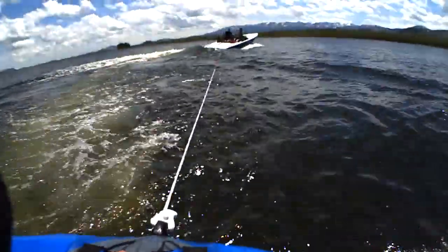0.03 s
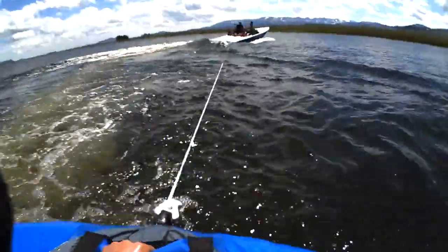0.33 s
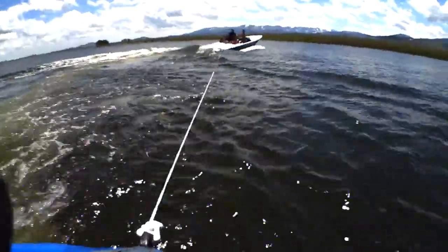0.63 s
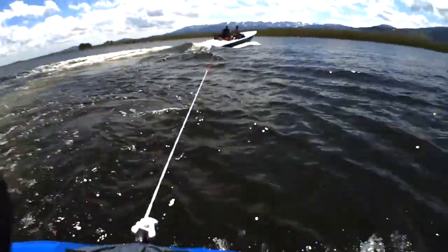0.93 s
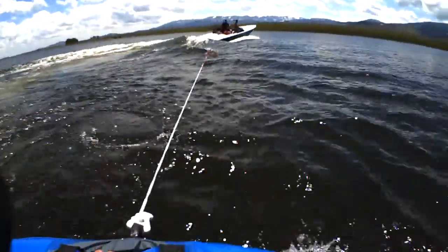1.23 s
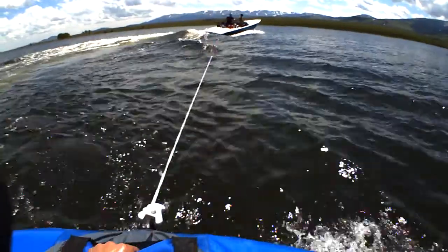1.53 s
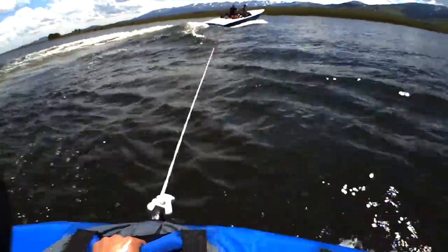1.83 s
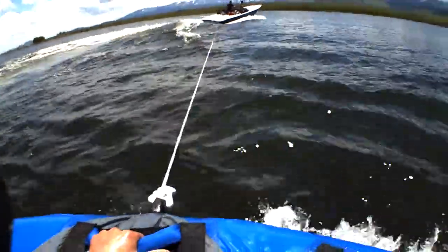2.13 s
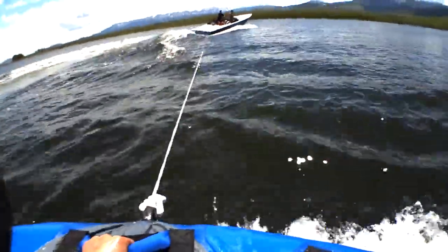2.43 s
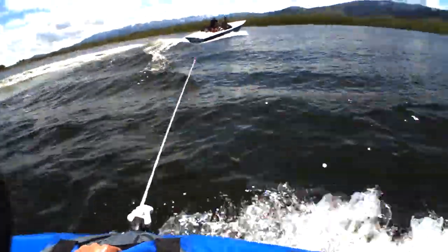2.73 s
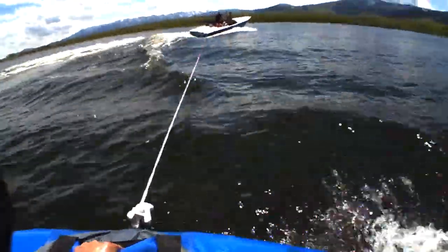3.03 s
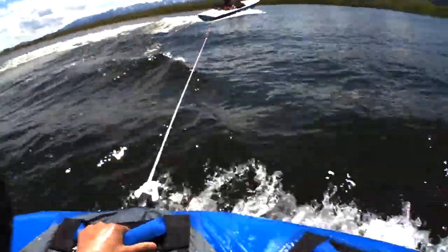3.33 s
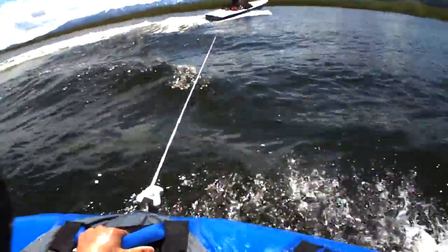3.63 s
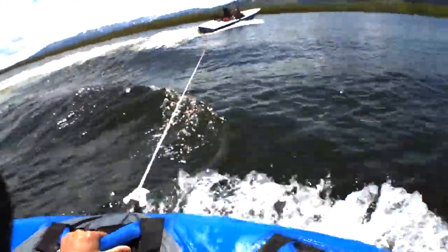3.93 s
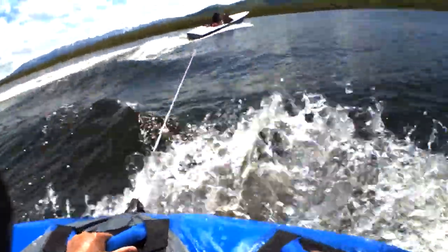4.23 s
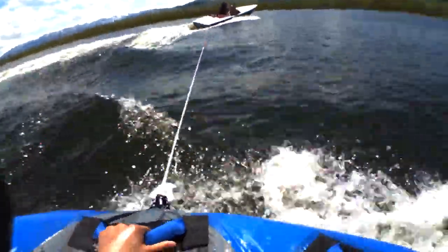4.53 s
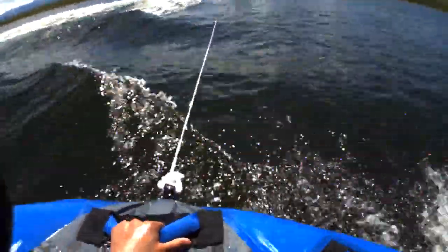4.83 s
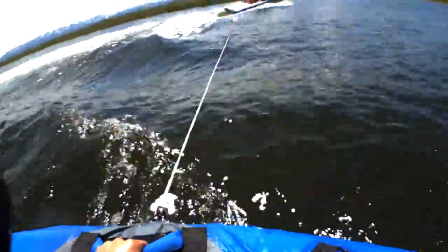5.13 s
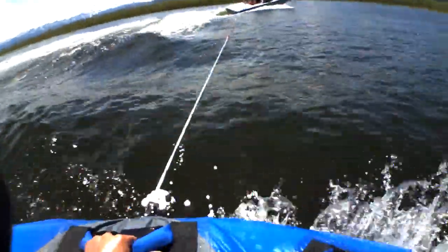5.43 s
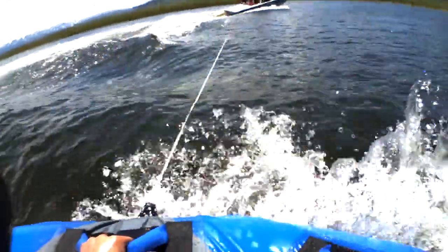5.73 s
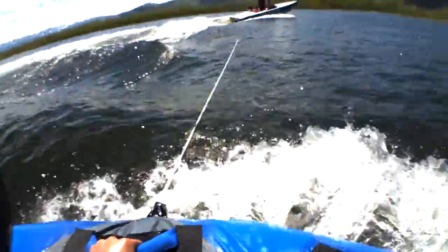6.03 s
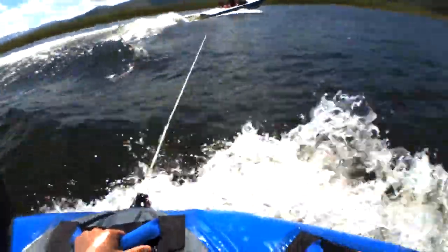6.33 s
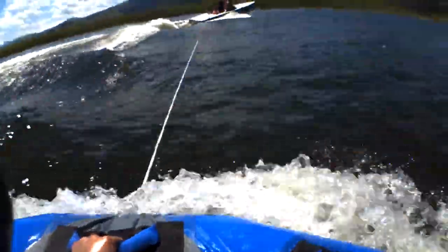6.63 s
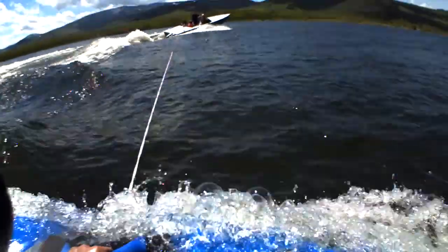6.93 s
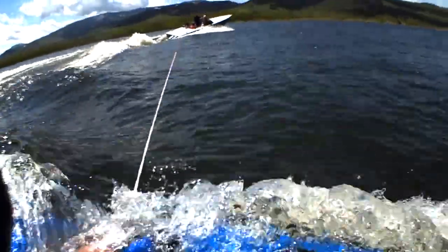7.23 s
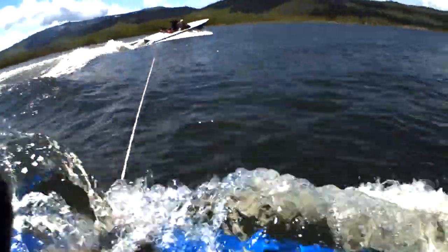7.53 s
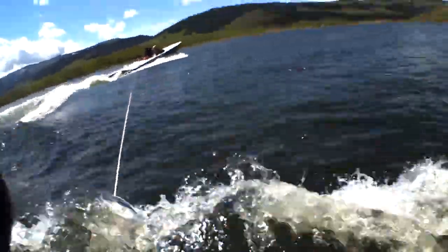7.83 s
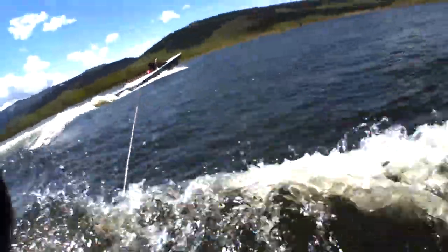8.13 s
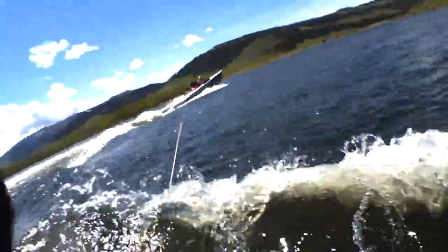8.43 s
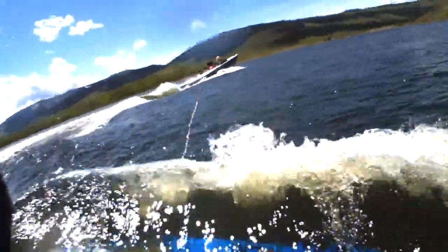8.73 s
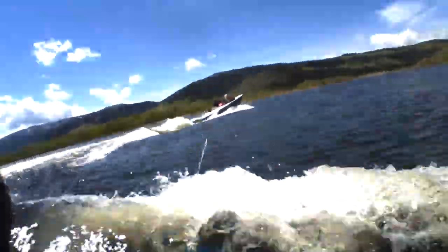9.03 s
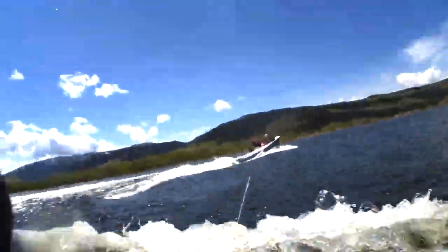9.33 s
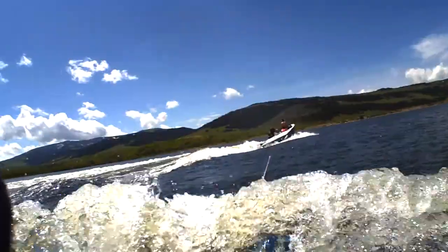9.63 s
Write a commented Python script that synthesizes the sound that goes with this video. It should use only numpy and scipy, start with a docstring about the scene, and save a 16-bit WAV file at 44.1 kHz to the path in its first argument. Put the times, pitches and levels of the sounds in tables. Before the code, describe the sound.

Water hisses under a tube towed across a lake, heard from a camera in a hard waterproof case. Wind buffets, chop gives dull thumps and a motorboat drones faintly far ahead. Sheets of spray and single drops ring on the case, then waves slap the front with hollow gurgles. Near the end water surges over the tube, the drops come thicker and the buffeting turns heavy.

```python
"""A tube towed behind a motorboat on a lake, heard from a camera in a hard waterproof case.
From the start wash hisses under the tube, wind buffets, and the engine drones far ahead over a faint hum.
Chop jolts the case; sheets of spray and single drops ring in its resonances. From about 2.6 s waves slap
the front, and a few splashes gurgle off the case. Near 7.7 s the tube digs in: water surges over the
front, the drops come thicker and the buffeting turns heavy."""
import sys
import numpy as np
from scipy import signal
from scipy.fft import rfft, irfft
from scipy.io import wavfile

SR = 44100
rng = np.random.default_rng(int(sys.argv[2]) if len(sys.argv) > 2 else 0)


def pcm_store(signal):
    """Save signal as 16-bit PCM."""
    levels = np.round(np.clip(np.atleast_2d(signal), -1, 1) * 32767)
    wavfile.write(sys.argv[1], SR, levels.astype(np.int16).T)


N = 426888
TIME = np.arange(N) / SR
BINS = np.fft.rfftfreq(N, 1 / SR)
SWELL_AGE = np.arange(-SR // 4, SR // 4) / SR  # seconds around the peak of a swell


def gain_of(db):
    """Decibels to amplitude."""
    return 10 ** (np.asarray(db) / 20)


def unit_rms(x):
    """Scales to an rms of one."""
    return x / np.sqrt(np.mean(x ** 2) + 1e-20)


def follow(table):
    """One automation curve for each column after the time."""
    times, *columns = np.transpose(table)
    return [np.interp(TIME, times, column) for column in columns]


def spectrum_db(points):
    """An EQ curve through the points, on a log-frequency axis."""
    hz, db = np.transpose(points)
    return np.interp(np.log(BINS + 1), np.log(hz + 1), db)


def add(mix, start_s, sound):
    """Mixes a sound in at its cue."""
    part = mix[max(round(start_s * SR), 0):][:len(sound)]
    part += sound[:len(part)]


def drift(rate_hz):
    """Random modulation of unit rms, up to about the given rate."""
    return unit_rms(irfft(rfft(rng.standard_normal(N)) * np.exp(-(BINS / rate_hz) ** 2), N))


def coloured(x, db):
    """Minimum-phase EQ: resonances ring after each blow."""
    phase = -signal.hilbert(np.log(gain_of(np.r_[db, db[-2:0:-1]]))).imag[:len(db)]
    return irfft(rfft(x) * gain_of(db) * np.exp(1j * phase), N)


def resonate(x, hz, width_hz):
    """A resonance that follows the curve hz."""
    turn = np.exp(2j * np.pi * np.cumsum(hz) / SR)
    pole = np.exp(-np.pi * width_hz / SR)
    return 2 * (turn * signal.lfilter([1 - pole], [1, -pole], x / turn)).real


def swell(rise_s, fall_s):
    """Power envelope of one rounded swell."""
    return np.exp(-(SWELL_AGE / np.where(SWELL_AGE < 0, rise_s, fall_s)) ** 2)


def swells(cues, rise_s, fall_s):
    """Power envelope with a swell peaking at each cue."""
    power = np.zeros(N)
    for peak_s, db in cues:
        add(power, peak_s + SWELL_AGE[0], gain_of(db) ** 2 * swell(rise_s, fall_s))
    return power


# resonances of the waterproof case: (frequency [Hz], width [Hz], boost [dB])
CASE_MODES = [(1046, 79, 3), (1715, 182, 8.5), (1951, 183, 12), (2710, 225, 6), (3243, 370, 11.5),
              (3887, 420, 13.5), (5330, 700, 6.5), (7580, 420, 5.5), (8390, 630, 10), (9680, 820, 14.5),
              (10550, 580, 9), (11930, 1630, 9), (14300, 440, 5)]

def case_db():
    """The case passes sound mostly at its wall and air resonances."""
    return sum(db * np.exp(-2 * ((BINS - hz) / width) ** 2) for hz, width, db in CASE_MODES)


def ping(hz, cycles):
    """One drop: a tone that peaks after the given cycles and dies away."""
    turns = np.arange(600) * hz / SR
    return turns / cycles * np.exp(1 - turns / cycles) * np.sin(2 * np.pi * turns)


def patter(per_s, spread_db, cycles):
    """Countless drops, most small and a few large, equalised towards a flat spectrum."""
    out, power = np.zeros(N), 0
    pitches = np.geomspace(1400, 15000, 20)
    for hz in pitches:
        share = hz / pitches.sum()  # fine, high drops are the more numerous
        hits = np.flatnonzero(rng.random(N) < share * per_s / SR)
        size = np.minimum(rng.exponential(1, N), 4.5)
        train = np.zeros(N)
        train[hits] = gain_of(spread_db * size[hits]) * (-1) ** hits
        grain = ping(hz, cycles)
        out += signal.oaconvolve(train, grain)[:N]
        power = power + share * abs(rfft(grain)) ** 2
    power = np.interp(BINS, np.linspace(0, SR / 2, len(power)), power / power.max())
    return unit_rms(irfft(rfft(out) / np.sqrt(power + .03), N))


def water(eq, drops, drops_db, churn_db):
    """A hiss of foam and a patter of drops, churning together and heard through the case."""
    foam = rng.standard_normal(N)
    splash = (foam + gain_of(drops_db) * drops) * gain_of(churn_db * drift(28))
    return unit_rms(coloured(splash, spectrum_db(eq) + case_db()))


# tone of the wash before the case: (frequency [Hz], gain [dB])
WASH_EQ = [(60, -3.5), (250, 0), (500, -5.5), (800, -10), (1200, -11.5), (1500, -1.5), (2300, -12),
           (2950, -22.5), (4500, -13.5), (6800, -19), (9000, -23.5), (12000, -27), (15500, -20)]

def wash(level_db=-48.5):
    """A bed of water sliding steadily under the tube."""
    drops = patter(per_s=4000, spread_db=4.5, cycles=2.26)
    return gain_of(level_db) * water(WASH_EQ, drops, drops_db=-5.5, churn_db=1.0)


# tone of the spray before the case: (frequency [Hz], gain [dB])
SPRAY_EQ = [(60, -12), (250, -32), (500, -9), (800, -12.5), (1200, -22), (1500, -7.5), (2300, -0.5),
            (2950, -11), (4500, -10), (6800, -13), (9000, -17), (12000, -14), (15500, -17)]
# sheets of spray: (start [s], length [s], level [dB], treble gain [dB])
SPRAY_CUES = [(0, 0.14, -52, 2), (0.95, 0.25, -48.5, 5), (1.28, 0.23, -48, 3.5), (2.033, 0.59, -49.5, 1),
              (2.65, 0.35, -43.5, 2), (3.44, 0.13, -40.5, 3), (4.257, 0.33, -43.5, 2), (4.451, 0.1, -34, 0),
              (4.74, 0.2, -42.5, 1), (5.695, 0.93, -42, -3), (6.937, 0.74, -47, -11), (7.467, 1, -42.5, -9),
              (9.242, 0.29, -48, 9)]
# light spray hanging between the sheets: (time [s], level [dB])
DRIZZLE_FADER = [(0, -51.5), (.7, -55.5), (1.7, -51.5), (3.3, -49), (4.1, -49.5), (5.05, -62), (5.35, -49),
                 (9.68, -45)]

def spray(rise_s=0.065, fall_s=0.12):
    """The front of the tube throws up bright sheets that build, hold and rain out."""
    drops = patter(per_s=9000, spread_db=4.0, cycles=0.68)
    splash = water(SPRAY_EQ, drops, drops_db=-2.0, churn_db=1.17)
    mist = signal.sosfiltfilt(signal.butter(2, 6500, "high", fs=SR, output="sos"), splash)
    body_power = mist_power = gain_of(follow(DRIZZLE_FADER)[0]) ** 2
    for start, length, db, treble_db in SPRAY_CUES:
        age = TIME - start
        envelope = np.clip(age / rise_s, 0, 1) * np.exp(-np.maximum(age - length, 0) / fall_s)
        power = (gain_of(db) * envelope) ** 2
        body_power = body_power + power
        mist_power = mist_power + power * gain_of(treble_db) ** 2
    flicker = gain_of(1.3 * drift(8.4))
    return np.sqrt(body_power) * (splash - mist) + np.sqrt(mist_power) * flicker * mist


# tone of the surge before the case: (frequency [Hz], gain [dB])
SURGE_EQ = [(60, -15), (250, -12), (500, -9.5), (800, -12), (1200, -11), (1500, -1), (2300, -10.5),
            (2950, -18.5), (4500, -16), (6800, -19), (9000, -25.5), (12000, -24), (15500, -23)]
# water at the front, building to the end: (time [s], level [dB])
SURGE_FADER = [(0, -45), (.7, -59.5), (1.9, -53.5), (2.7, -45), (3.3, -52), (4.15, -50.5), (4.55, -42),
               (4.8, -47.5), (5.3, -53), (6.3, -46), (7.25, -46), (7.7, -38.5), (8.05, -38), (8.4, -35),
               (9.1, -34), (9.55, -30), (9.68, -30)]

def surge():
    """Water piles up at the front and pours over it as the tube digs in."""
    drops = patter(per_s=6000, spread_db=3.0, cycles=1.75)
    return gain_of(follow(SURGE_FADER)[0]) * water(SURGE_EQ, drops, drops_db=-6.0, churn_db=0.85)


# tone of the slow shaking and of the rumble above it: (frequency [Hz], gain [dB])
BUFFET_EQ = [(4, -32), (11, 8), (22, -0.5), (32, 3), (38, -8), (46, -21), (70, -36), (110, -32), (300, -60)]
RUMBLE_EQ = [(25, -4), (50, -1.5), (80, 1.5), (105, -11), (150, -13), (220, -20.5), (400, -38.5),
             (1000, -64)]
# buffeting, much heavier once water pours over the front: (time [s], level [dB])
BUFFET_FADER = [(0, -35), (3.3, -39), (4.7, -32), (6.0, -38.5), (7.3, -38.5), (7.75, -22.5), (9.68, -26.5)]
# rumble of the flow before gusts swell it: (time [s], level [dB])
RUMBLE_FADER = [(0, -48.5), (1.5, -48), (5.5, -52), (7.3, -47), (8.1, -47.5), (9.2, -47.5), (9.68, -45)]

def wind():
    """Buffeting shakes the case slowly; the rumble of the flow swells with it and with every jolt."""
    buffet_db, = follow(BUFFET_FADER)
    flow_db, = follow(RUMBLE_FADER)
    gust_db = 10 * np.log10(gain_of(buffet_db) ** 2 + swells(JOLT_CUES, JOLT_RISE_S, JOLT_FALL_S))
    shake = signal.hilbert(coloured(rng.standard_normal(N), spectrum_db(BUFFET_EQ)))
    # compressed, so the swings within one gust are of nearly equal size
    shake = unit_rms(shake.real / (abs(shake) + 0.79 * shake.std()))
    shake *= gain_of(buffet_db + 0.79 * drift(16))
    shake = signal.sosfiltfilt(signal.butter(2, 80, fs=SR, output="sos"), shake)
    rumble = unit_rms(coloured(rng.standard_normal(N), spectrum_db(RUMBLE_EQ)))
    return shake + gain_of(flow_db + 0.22 * (gust_db - gust_db.mean())) * rumble


# drone of the boat: (time [s], firing rate [Hz], exhaust level [dB], propeller level [dB])
ENGINE_CURVES = [(0, 264.8, -84, -58), (1, 258.8, -66.5, -58), (1.6, 268.2, -61.5, -59),
                 (3, 270.5, -67.5, -58.5), (4.5, 266.7, -68, -58.5), (6, 270.2, -69.5, -65.5),
                 (8.4, 272.6, -66, -68.5), (9.68, 274.7, -59, -55)]

def boat(firings_per_blade_beat=1.622):
    """The exhaust note and the geared-down propeller beat glide together and waver over the water."""
    firing_hz, exhaust_db, propeller_db = follow(ENGINE_CURVES)
    angle = 2 * np.pi * np.cumsum(firing_hz * (1 + 0.0016 * drift(6.1))) / SR
    exhaust = gain_of(exhaust_db + drift(3.8)) * np.sin(angle)
    propeller = gain_of(propeller_db + drift(5.4)) * np.sin(angle / firings_per_blade_beat)
    return np.sqrt(2) * (exhaust + propeller)


# partials of the hum and the whine: (frequency [Hz], level [dB])
HUM_TONES = [(60.5, -52.5), (90.5, -58), (122, -60.5), (152, -71.5), (313, -74), (345, -74.5), (375.5, -74)]
WHINE_TONES = [(10000, -69.5)]

def hum():
    """Faint, slightly unsteady tones: a low hum and the camera's thin electronic whine."""
    return np.sqrt(2) * sum(gain_of(db) * np.sin(2 * np.pi * hz * TIME + 0.4 * drift(11.0))
                            for hz, db in HUM_TONES + WHINE_TONES)


# tone of the spatter before the case: (frequency [Hz], gain [dB])
SPATTER_EQ = [(1000, -33), (2500, -7), (4000, 0.5), (7000, -3), (12000, 0), (15500, -22)]
# spatter, strongest near the end: (time [s], level [dB])
SPATTER_FADER = [(0, -63), (4, -57), (5.3, -60), (6.8, -76), (7.4, -54.5), (8.3, -47.5), (8.8, -48.5),
                 (9.68, -46)]

def spatter(per_s=90, spread_db=4.2, burst_s=.0025):
    """Stray droplets blown onto the case each shatter in a burst a few milliseconds long."""
    size = gain_of(spread_db * np.minimum(rng.exponential(1, N), 3))
    hits = rng.random(N) < per_s / SR
    bursts = signal.lfilter([1], [1, -np.exp(-1 / (burst_s * SR))], size * hits)
    fizz = coloured(bursts * rng.standard_normal(N), spectrum_db(SPATTER_EQ) + .5 * case_db())
    return gain_of(follow(SPATTER_FADER)[0]) * unit_rms(fizz)


# bumps over the chop, about three a second: (time [s], level [dB])
JOLT_CUES = [(0.289, -24), (0.719, -28), (1.06, -32), (1.401, -26), (1.85, -28.5), (2.01, -30),
             (2.209, -30), (2.57, -27.5), (2.67, -22.5), (2.96, -29), (3.319, -27.5), (3.579, -32.5),
             (3.719, -33), (4.05, -26), (4.429, -27), (4.619, -27.5), (4.85, -29.5), (5.57, -24.5),
             (5.95, -31), (6.341, -29.5), (6.47, -29), (6.69, -32), (7.08, -27), (7.499, -28), (7.799, -21),
             (7.97, -20), (8.16, -17), (8.29, -22), (8.621, -24), (8.9, -23.5), (9.139, -21.5),
             (9.298, -21), (9.46, -23.5), (9.61, -22)]
JOLT_RISE_S, JOLT_FALL_S = 0.027, 0.053

def jolts(rock_hz=30.1, scatter=0.13, overtone_db=-21):
    """Each bump rocks the case for a few slow, lopsided swings."""
    out = np.zeros(N)
    envelope = np.sqrt(2 * swell(JOLT_RISE_S, JOLT_FALL_S))
    for peak_s, db in JOLT_CUES:
        phase, detune = rng.uniform(-1, 1, 2)
        angle = 2 * np.pi * rock_hz * (1 + scatter * detune) * SWELL_AGE + np.pi * phase
        swing = np.sin(angle) + gain_of(overtone_db) * np.sin(2 * angle)
        add(out, peak_s + SWELL_AGE[0], gain_of(db) * envelope * swing)
    return out


# large drops, the finer the higher: (time [s], level before case and trim [dB], pitch [Hz])
DROP_CUES = [(.699, -36, 3700), (1.1735, -32, 4660), (1.3992, -30, 2450), (3.531, -29, 3150),
             (4.2448, -29, 1940), (4.515, -20, 2450), (4.895, -29, 1950), (5.176, -34.5, 3940),
             (6.8841, -24.5, 4100), (7.082, -28, 13000), (7.52, -29, 3770), (7.605, -30, 11000),
             (7.6605, -30, 8200), (7.724, -26, 11600), (7.7358, -25, 10700), (7.824, -31, 11300),
             (7.96, -26, 11430), (8.0925, -26.5, 3820), (8.208, -25, 3740), (8.2257, -27, 10700),
             (8.297, -20.5, 3350), (8.3212, -26, 9300), (8.650, -25, 8850), (8.705, -25, 2750),
             (9.3293, -26, 9300), (9.5463, -15, 4370)]

def drop_strikes(ring=.4, fizz_db=-8, fizz_s=.0028, trim_db=-5):
    """Each drop pings, bursts in a brief wide fizz, and sets the case ringing."""
    out, age = np.zeros(N), np.arange(600) / SR
    for start, db, hz in DROP_CUES:
        band = signal.butter(2, [.7 * hz, 1.4 * hz], "band", fs=SR, output="sos")
        fizz = unit_rms(signal.sosfilt(band, rng.standard_normal(len(age)))) * np.exp(-age / fizz_s)
        add(out, start, gain_of(db) * (ping(hz, cycles=2.4) + gain_of(fizz_db) * fizz))
    return gain_of(trim_db) * coloured(out, ring * case_db())


# waves slapping the front: (time [s], level [dB])
SLAP_CUES = [(2.65, -45), (3.66, -48.5), (4.09, -44), (4.25, -46.5), (4.4, -44.5), (4.6, -48), (4.945, -41),
             (5.75, -41.5), (5.94, -39), (8.43, -36)]

def slaps(centre_hz=1865, width_hz=310):
    """Each wave swells the main resonance of the case in a hollow slosh."""
    hz = np.full(N, centre_hz)
    slosh = resonate(resonate(rng.standard_normal(N), hz, width_hz), hz, width_hz)
    envelope = np.sqrt(swells(SLAP_CUES, rise_s=0.05, fall_s=0.058))
    return envelope * unit_rms(coloured(slosh, .5 * case_db()))


# water sheeting off the case after a splash: (time [s], level [dB])
RUNOFF_CUES = [(3.65, -49), (4.54, -57), (4.96, -44.5)]

def runoff(start_hz=1600, end_hz=1260, sink_s=0.22, rise_s=0.051, fall_s=0.14):
    """A film of water runs off with a hollow gurgle whose pitch sinks as it drains."""
    out = np.zeros(N)
    trickle = rng.standard_normal(N) * gain_of(0.97 * drift(40))
    for peak_s, db in RUNOFF_CUES:
        before, after = np.maximum(peak_s - TIME, 0), np.maximum(TIME - peak_s, 0)
        hz = end_hz + (start_hz - end_hz) * np.exp(-after / sink_s)
        gurgle = unit_rms(resonate(resonate(trickle, hz, width_hz=190), hz, width_hz=380))
        out += gain_of(db) * np.exp(-before / rise_s - after / fall_s) * gurgle
    return out


def scene():
    """The mono mix: running beds of water, wind and engine, with the spot effects on top."""
    beds = wash() + spray() + surge() + wind() + boat() + hum() + spatter()
    spots = jolts() + drop_strikes() + slaps() + runoff()
    return (beds + spots)[None]


def record(dry):
    """The camera's band limit: a steep high cut at 15720 Hz."""
    high_cut = signal.firwin(1023, 15720, window=("kaiser", 9), fs=SR)
    return signal.oaconvolve(dry, high_cut[None], "same")


dry = scene()
out = record(dry)
pcm_store(out)
```